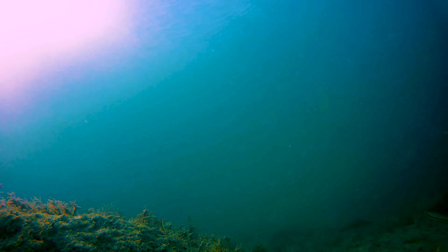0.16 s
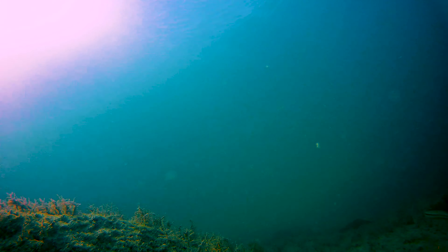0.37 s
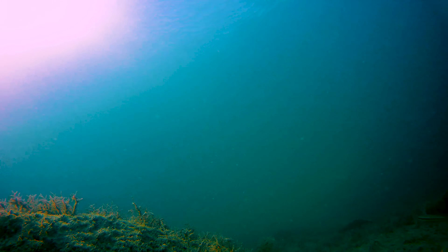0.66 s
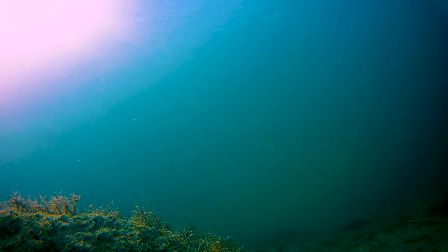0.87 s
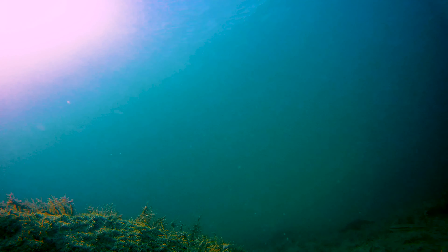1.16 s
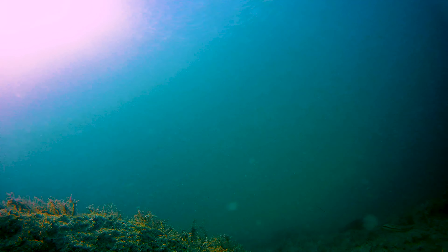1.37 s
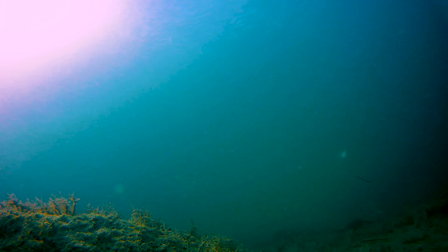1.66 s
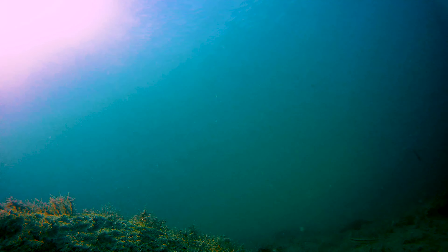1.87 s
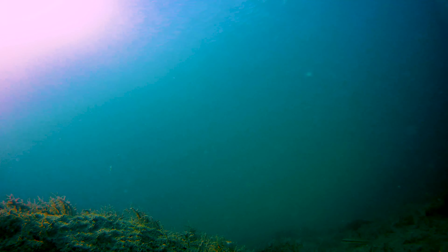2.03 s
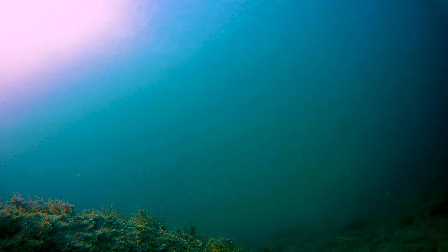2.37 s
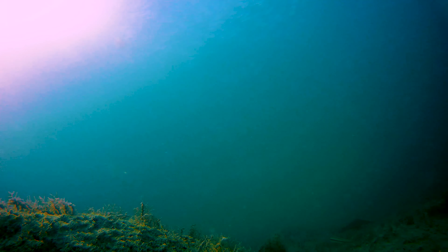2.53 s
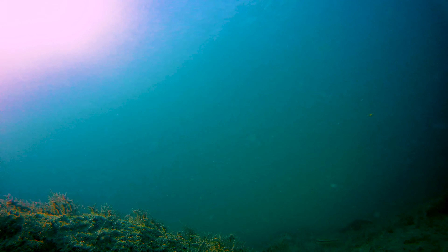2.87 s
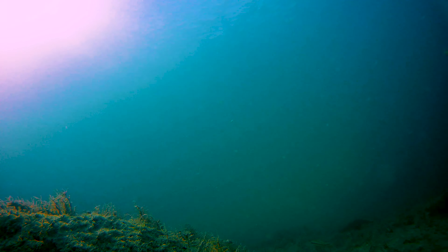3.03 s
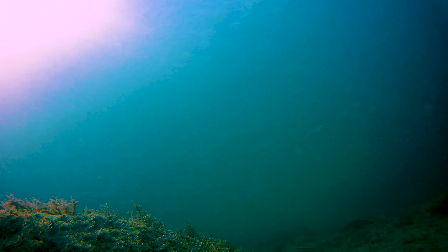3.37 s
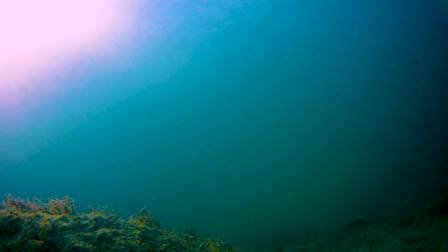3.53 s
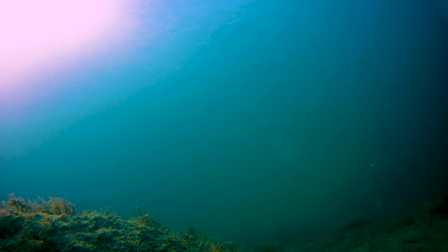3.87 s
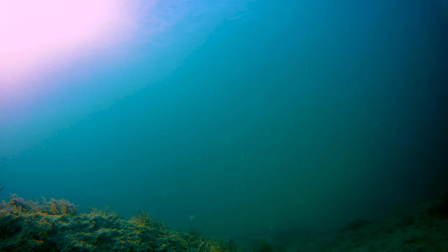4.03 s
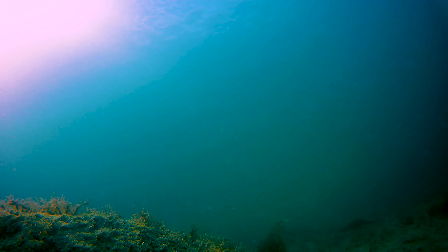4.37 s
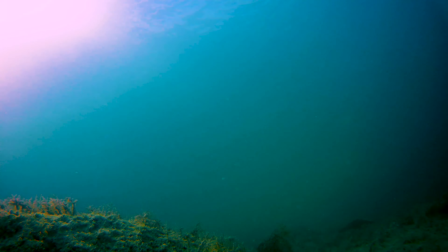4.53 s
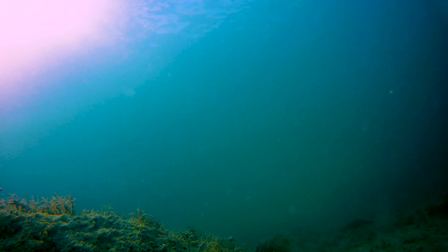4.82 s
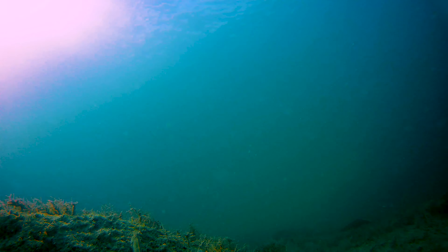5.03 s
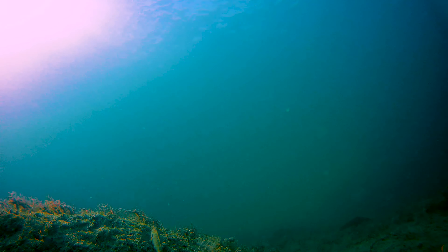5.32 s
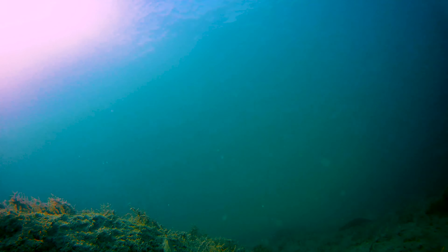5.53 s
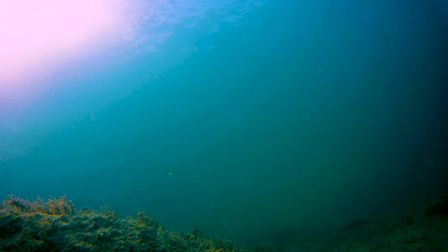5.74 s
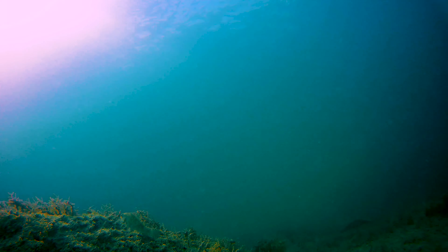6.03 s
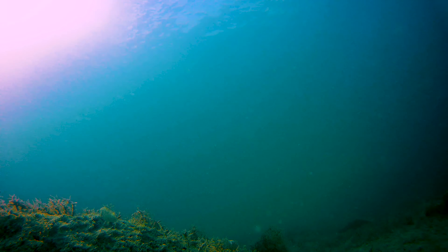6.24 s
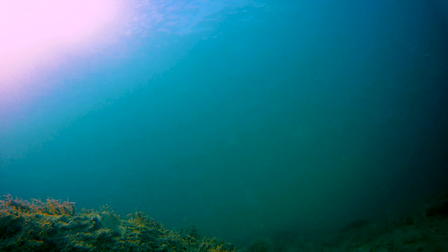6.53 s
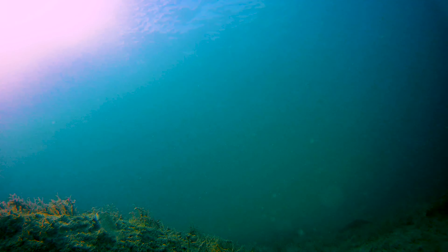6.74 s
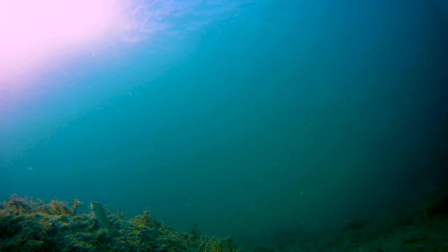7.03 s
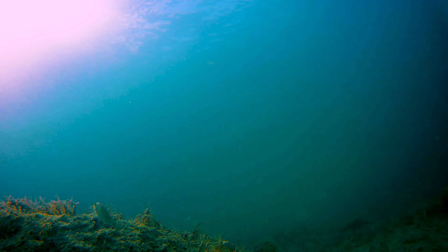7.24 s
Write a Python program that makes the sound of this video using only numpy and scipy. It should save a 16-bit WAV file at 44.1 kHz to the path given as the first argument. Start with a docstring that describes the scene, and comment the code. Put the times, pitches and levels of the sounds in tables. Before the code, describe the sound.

The sound is close and enclosed, from a microphone inside a sealed housing on the sea bed. Throughout, deep water wash and two unsteady low throbs swell beneath faint hiss, while fine sand patters in gusts and larger grit makes irregular dry clicks, several per second, with tiny rebounds and short ringing. From 0 to about 4.3 seconds, current drums on the shell in muffled, uneven gurgles. Soft knocks open the scene, with a deep bump at 0.6 and more around 2.5 to 3.4 seconds. The gurgling slackens towards 5 seconds, exposing the ticks. At 5.3 a single heavy, hollow knock is the loudest event; a tight cluster of duller thuds follows near 5.8. Thin, faint wavering hums appear from 5.3, again around 5.9 and near 6.9. Weaker drumming returns from 6 seconds and continues with ticking grit until the end at 7.4.

```python
"""A sealed camera housing on the sea bed in a strong current, heard by a microphone inside it for 7.4 s.
Throughout: open-water wash, two low sway tones of the mount, ticking grit and pattering sand on the ringing shell.
From the start eddies drum on the shell as shaped noise, and soft knocks strike a few of its modes.
The eddies slacken near 5 s; the heaviest knock falls at 5.3 s and a cluster follows near 5.8 s.
From 5.3 s thin wavering hums fade in and out, and part of the drumming returns from 6 s."""
import sys
import numpy as np
from scipy import signal
from scipy.fft import rfft, irfft, next_fast_len
from scipy.io import wavfile
from scipy.ndimage import uniform_filter1d

SR = 44100
rng = np.random.default_rng(int(sys.argv[2]) if len(sys.argv) > 2 else 0)


def persist_wave(psi):
    """Save psi, clipped to +-1, as 16-bit WAV."""
    counts = np.round(np.clip(psi, -1, 1) * 32767).astype(np.int16)
    wavfile.write(sys.argv[1], SR, np.atleast_2d(counts).T)


def gain_from_decibels(decibels):
    """Convert decibel values to linear amplitude factors."""
    exponent = np.asarray(decibels, float) / 20
    return 10 ** exponent


N = 325899

# Spectra. Each row: frequency in Hz, relative density in dB per Hz.
HISS_SPECTRUM = [(530, -18), (900, 1), (1100, -3), (1650, -1.5), (3340, -11), (3950, -12), (4560, -14),
                 (5450, -11.5), (6440, -15.5), (10800, -16.5), (15600, -19)]
WATER_SPECTRUM = [(12, -45), (20, -10), (43, -3), (58, -0.5), (79, -10.5), (107, -18), (134, -20.5),
                  (236, -43), (344, -28.5), (422, -38.5), (527, -31), (615, -34.5), (1200, -50),
                  (1560, -69), (2640, -120)]
EDDY_SPECTRUM = [(44, -46), (75, -54), (79, -21), (81, -28), (139, -10), (170, -2.5), (313, -10),
                 (384, -21), (477, -9), (614, -21.5), (680, -16.5), (780, -35), (874, -28), (947, -60),
                 (1150, -37), (1500, -32.5), (2530, -120)]
# Sway modes of the mount, shaken unevenly. Each row: time in seconds, pitch in Hz, rms level in dB.
LOW_SWAY = [(0.0, 31.8, -35), (0.14, 32.1, -34), (0.22, 34.9, -33), (0.35, 33.2, -31), (0.82, 34.2, -38.5),
            (0.9, 34.4, -25), (0.93, 31.8, -38), (1.15, 33.7, -40), (1.27, 34.3, -33), (1.77, 34, -39.5),
            (2.57, 31.68, -30), (2.98, 31.87, -31), (3.02, 32.14, -28), (3.72, 31.65, -33),
            (3.91, 33.1, -28.5), (4.14, 34.55, -38), (4.28, 34.2, -28), (4.73, 34.14, -28.5),
            (4.9, 32.76, -32.5), (5.29, 33.26, -31), (5.5, 29.9, -53), (5.6, 34.14, -38),
            (5.93, 33.89, -30.5), (6.03, 37.5, -37.5), (6.15, 35.7, -29), (6.52, 35.5, -30),
            (6.63, 34.53, -26.5), (7.29, 34.3, -29.5), (7.37, 36.4, -28), (7.39, 37.1, -69)]
HIGH_SWAY = [(0.0, 50.6, -30.5), (0.12, 52, -25), (0.25, 56.6, -36.5), (0.33, 52.55, -36),
             (0.51, 52.05, -23.5), (1.21, 51.95, -34.5), (1.46, 52.06, -26), (1.54, 49.14, -32),
             (1.63, 48.74, -30), (1.77, 52.96, -26), (2.02, 54.46, -32), (2.1, 53.23, -24.5),
             (2.18, 52.98, -39.5), (2.45, 54.8, -26.5), (2.55, 52.38, -27.5), (2.74, 51.74, -40),
             (2.8, 52.6, -26), (3.04, 52.94, -39), (3.21, 50.4, -23.5), (3.38, 51.07, -41),
             (3.5, 55.3, -24.5), (3.66, 53.7, -36), (3.95, 55.03, -28.5), (3.97, 56.5, -49),
             (4.05, 55.8, -25.5), (4.22, 53.9, -25.5), (4.51, 53.1, -24), (4.59, 52.86, -42),
             (4.69, 47.8, -33.5), (4.82, 50.6, -25.5), (5.41, 50.54, -31), (5.45, 50.56, -48),
             (5.54, 54.1, -30), (6.05, 55.53, -37), (6.13, 53.7, -31.5), (6.5, 51.67, -34),
             (6.57, 53.95, -36), (6.81, 53.17, -35.5), (6.96, 59.7, -41), (7.02, 59.5, -38),
             (7.16, 52.74, -30.5), (7.39, 49.27, -34)]
# Strength of the eddies on the shell. Each row: time in seconds, rms level in dB.
EDDY_STRENGTH = [(0.0, -42.5), (0.22, -41.5), (1.79, -39.5), (2.16, -42), (2.45, -40.5), (4.2, -43.5),
                 (4.45, -50.5), (4.94, -61.5), (5.64, -61), (5.97, -48), (6.4, -51.5), (6.9, -53),
                 (7.1, -45.5), (7.39, -47.5)]
# Faint hums in the flow. Each row: start in seconds, length in seconds, pitch in Hz, rms level in dB.
FLOW_HUMS = [(5.33, 0.456, 174.7, -53), (5.9, 0.47, 188.2, -54.5), (6.861, 0.63, 320.8, -58),
             (6.85, 0.65, 192.3, -52)]
# Modes of the shell. Each row: frequency in Hz, relative level in dB, t60 in seconds.
SHELL_MODES = [(86, -7.5, 0.27), (122, 7, 0.18), (155, 3.5, 0.1), (200, -12, 0.0652), (246, -7, 0.16),
               (326.6, 0, 0.09), (441, 4, 0.021), (519.6, 4, 0.042), (648, -2, 0.045), (870, -9.5, 0.038),
               (1050, -20, 0.081), (1260, -17.5, 0.063), (1400, -5, 0.026), (1660, -6.5, 0.03),
               (1962, -10.5, 0.031), (2244, -8.5, 0.025), (2420, -13.5, 0.034), (2680, -8, 0.022),
               (3016, -11, 0.026), (3780, -6.5, 0.021), (4100, -7.5, 0.022), (4840, -12.5, 0.03),
               (5310, -2.5, 0.017), (5680, -7, 0.025), (5930, -4.5, 0.016), (6950, -4, 0.01),
               (7640, -3.5, 0.015), (9000, -5, 0.022), (9800, -2, 0.015), (10560, 10.5, 0.0094),
               (12200, 1, .006), (13600, -9, .006)]
# Soft, heavy blows. Each row: start in seconds, level in dB, centre of the modes struck in Hz, spread in octaves.
SOFT_BLOWS = [(.008, -24, 1050, 0.16), (.074, -25.5, 544, 0.23), (0.271, -34, 122, 0.64),
              (0.622, -21, 86, 0.21), (2.53, -26.5, 86, 0.29), (2.808, -30.5, 513, 0.18),
              (3.312, -27, 86, 0.35), (3.385, -32, 647.4, 0.28), (4.509, -41.5, 122, 0.25),
              (4.751, -41, 328, 1.2), (5.2929, -18.5, 644, 0.53), (5.2928, -8.5, 1557, 0.29),
              (5.2944, -26, 2260, 0.15), (5.2998, -30, 900, 0.41), (5.7659, -24.5, 648, 0.43),
              (5.771, -26.5, 515, 0.33), (5.778, -25.5, 392, 0.29), (5.776, -27, 154.5, 0.96),
              (5.786, -26.5, 282, 0.72), (5.797, -30, 200, 0.78), (5.99, -36.5, 122, 0.35),
              (6.34, -41, 122, 0.48), (7.029, -37, 118.1, 0.55)]
# Larger grit. Each row: start in seconds, dull level in dB, dull centre in Hz, middle-mode level in dB,
# bright level in dB, bright centre in Hz.
GRIT = [(0.0377, -42.5, 1850, -42.5, -34.5, 5400), (0.1281, -50, 1620, -63, -50, 5490),
        (0.1733, -46, 2370, -56, -44, 5800), (0.2, -67, 2390, -69, -50, 5660),
        (0.2846, -50, 2120, -55, -52.5, 5350), (0.354, -38, 2200, -47, -53, 7070),
        (0.385, -60, 2000, -59, -55, 5400), (0.43, -35, 1990, -50, -58, 7050),
        (0.435, -34.5, 1550, -45, -48, 5940), (0.5172, -37.5, 1630, -61, -63, 6500),
        (0.523, -53, 1740, -57, -50, 6240), (0.538, -32, 2000, -54, -56, 5980),
        (0.618, -60, 2000, -65, -58, 5600), (0.6675, -46, 1760, -49, -52, 5510),
        (0.745, -60, 2000, -62, -56, 5500), (0.8199, -47, 1750, -62, -46.5, 5580),
        (0.8724, -54, 1400, -67, -65, 5430), (0.8926, -59, 1870, -59, -53, 5480),
        (0.9035, -50, 2440, -49, -50, 5880), (0.924, -49, 2870, -56, -51, 5690),
        (0.948, -43, 1510, -52, -57, 6520), (0.988, -61, 2000, -62, -56, 5400),
        (1.071, -58, 2595, -56, -51, 5520), (1.3767, -44.5, 2180, -45, -46, 5880),
        (1.401, -31.5, 1560, -61, -57, 5900), (1.5967, -48, 1743, -46, -43, 5510),
        (1.6702, -46, 1400, -50, -48, 5970), (1.715, -37.5, 2410, -52, -42.5, 7500),
        (1.809, -56, 1730, -60, -48, 5960), (1.858, -44, 1821, -60, -53, 5400),
        (1.8684, -49, 2190, -54, -41.5, 5960), (1.9782, -45.5, 2440, -46, -46.5, 5820),
        (2.0475, -40.5, 1680, -40.5, -43.5, 5890), (2.0915, -62, 1985, -58, -57, 10500),
        (2.1214, -51, 1920, -56, -43, 5740), (2.129, -44.5, 1690, -64, -67, 5300),
        (2.23, -38, 2440, -46, -46, 7050), (2.2694, -40, 2345, -57, -50, 5506),
        (2.371, -38.5, 2206, -47.5, -59, 6930), (2.4718, -50, 1500, -66, -60, 5400),
        (2.6427, -35.5, 1750, -40, -40.5, 5334), (2.676, -45, 1990, -50, -62, 5190),
        (2.81, -44, 2240, -57, -49.5, 5600), (2.881, -45, 1522, -52, -40, 5270),
        (2.8866, -44, 2240, -36.5, -39, 5390), (2.914, -47, 1660, -52, -55, 6197),
        (3.0143, -33, 1995, -39.5, -63, 5640), (3.235, -45, 1612, -64, -64, 5110),
        (3.246, -44, 2050, -60, -64, 6190), (3.27, -46, 1630, -48, -42.5, 5400),
        (3.3136, -50, 1740, -50, -45, 6180), (3.5327, -44.5, 2287, -53, -46, 5567),
        (3.8018, -41.5, 1883, -46.5, -41.5, 5610), (3.9795, -40, 1940, -61, -54, 5280),
        (4.0585, -34.5, 1907, -39.5, -45, 6350), (4.2243, -39.5, 1676, -63, -56, 5960),
        (4.278, -38, 1852, -41, -43, 5470), (4.3042, -44, 1950, -55, -46, 5520),
        (4.466, -48, 2165, -53, -46, 6017), (4.4977, -45, 2248, -50, -50, 5433),
        (4.5343, -40.5, 1732, -64, -64, 7020), (4.577, -59, 1910, -49, -46, 6040),
        (4.5875, -36.5, 1630, -64, -58, 5680), (4.7508, -41, 2458, -49, -43.5, 5890),
        (4.8189, -53, 1645, -63, -42.5, 5780), (4.9208, -46, 1667, -54, -45, 5560),
        (4.9617, -38, 2283, -42, -45, 5416), (5.005, -59, 1510, -60, -61, 5510),
        (5.0436, -38, 1480, -60, -64, 5630), (5.056, -41, 1740, -47, -52, 5600),
        (5.1028, -56, 1535, -69, -55, 5450), (5.129, -52, 2010, -60, -52, 5820),
        (5.2106, -36, 1939, -53, -59, 5300), (5.221, -54, 2510, -57, -47, 5760),
        (5.229, -38, 2377, -46, -35, 5375), (5.2943, -60, 1590, -45, -41.5, 5707),
        (5.441, -42, 2350, -57, -57, 6200), (5.5174, -44, 1872, -64, -61, 5800),
        (5.5556, -37, 1860, -53, -49, 5390), (5.735, -54, 2237, -57, -46, 6300),
        (5.76, -43.5, 2005, -51, -49, 5810), (5.9797, -41.5, 1523, -50, -59, 6000),
        (6.062, -51, 2105, -56, -49, 5470), (6.2696, -45, 2106, -51, -56, 6594),
        (6.3836, -42, 2148, -48, -37, 5460), (6.429, -49, 1952, -60, -62, 5570),
        (6.4644, -38.5, 1509, -64, -58, 5720), (6.4898, -43, 2168, -57, -52, 5840),
        (6.6013, -32, 1808, -57, -42.5, 7140), (6.75, -49, 2200, -58, -52, 5600),
        (6.8436, -44.5, 1732, -47, -52, 5394), (6.901, -46, 1890, -58, -52, 5490),
        (7.0474, -58, 1885, -64, -51, 6140), (7.0643, -38.5, 1880, -60, -59, 5570),
        (7.077, -40, 1870, -53, -59, 5730), (7.099, -40, 2140, -47, -47.5, 5490),
        (7.1491, -33.5, 1860, -48, -48, 7260), (7.2136, -43, 2040, -57, -48.5, 6020)]

SHELL_HZ = np.array(SHELL_MODES)[:, 0]
SWELLS_PER_S = 2.95


def curve(table, column):
    """One column of a table, interpolated sample by sample."""
    rows = np.array(table, float)
    return np.interp(np.arange(N) / SR, rows[:, 0], rows[:, column])


def walk(rate_per_s):
    """Random levels held 1 / rate_per_s seconds and slewed twice; spread near 1."""
    hold = int(SR / rate_per_s)
    steps = np.repeat(rng.standard_normal(N // hold + 1), hold)
    slewed = uniform_filter1d(uniform_filter1d(steps, hold), hold)
    return 1.196 * slewed[:N]


def noise(spectrum_db, rms_db, flicker_db, flickers_per_s, swell_db=0, bands_per_octave=1):
    """Shaped noise whose overlapping bands flicker and swell each on their own."""
    size = next_fast_len(N)
    octave = np.log2(np.arange(1, size // 2 + 2) * SR / size)
    hz, shape_db = np.transpose(spectrum_db)
    gain = gain_from_decibels(np.interp(octave, np.log2(hz), shape_db, -120, -120))
    spectrum = rfft(rng.standard_normal(size)) * gain
    out = 0
    for centre in np.arange(np.floor(np.log2(hz[0])), np.log2(hz[-1]) + 1, 1 / bands_per_octave):
        window = np.clip(1 - bands_per_octave * abs(octave - centre), 0, 1)
        band = irfft(spectrum * window, size)[:N]
        level_db = flicker_db * walk(flickers_per_s) + swell_db * walk(SWELLS_PER_S)
        out = out + band * gain_from_decibels(level_db)
    return out * gain_from_decibels(rms_db) / np.sqrt(np.mean(out ** 2))


def hiss():
    """Microphone hiss: shaped noise with a slight flicker."""
    return noise(HISS_SPECTRUM, -62, flicker_db=0.7, flickers_per_s=12)


def water():
    """Deep wash of open water: low noise whose bands flicker."""
    return noise(WATER_SPECTRUM, -36.5, flicker_db=2.5, flickers_per_s=6.8)


def sway(table):
    """One mode of the mount, nearly a sine, nudged in pitch and swing by the buffeting."""
    hz = curve(table, 1) * (1 + 0.0038 * walk(7.6))
    rms_db = curve(table, 2) + 0.6 * walk(8)
    cycles = np.cumsum(hz) / SR + rng.random()
    return np.sqrt(2) * gain_from_decibels(rms_db) * np.sin(2 * np.pi * cycles)


def eddies():
    """Turbulence drums on the shell in uneven gurgles and slackens with the current."""
    drumming = noise(EDDY_SPECTRUM, 0, flicker_db=1, flickers_per_s=12, swell_db=3, bands_per_octave=3)
    return drumming * gain_from_decibels(curve(EDDY_STRENGTH, 1))


def hums():
    """Thin tones in the flow that fade in, waver in pitch and level and fade out."""
    fade_s, pitch_waver = 0.11, 0.01238
    t, out = np.arange(N) / SR, 0
    for start_s, length_s, hz, rms_db in FLOW_HUMS:
        fade = np.clip(np.minimum(t - start_s, start_s + length_s - t) / fade_s, 0, 1)
        level = fade * gain_from_decibels(rms_db + 4.2 * walk(9))
        cycles = np.cumsum(hz * (1 + pitch_waver * walk(8.4))) / SR
        out = out + np.sqrt(2) * level * np.sin(2 * np.pi * cycles)
    return out


def struck(db, centre_hz, spread_octaves):
    """Drive of each mode for blows that move chiefly the modes near their own hardness."""
    spreads_off = np.log2(SHELL_HZ / centre_hz[:, None]) / spread_octaves
    return db[:, None] - 6 * spreads_off ** 2


def sample_index(s):
    """Times in seconds as sample numbers, kept inside the scene."""
    return np.clip((SR * s).astype(int), 0, N - 1)


def crack(s, db):
    """Dry snap of each contact: a band of noise that dies in a few milliseconds."""
    t60_s, band_hz = 0.005, [1500, 7000]
    push = np.bincount(sample_index(s), gain_from_decibels(db), N)
    fade = np.exp(-np.log(1000) / (t60_s * SR))
    burst = signal.lfilter([1], [1, -fade], push) * rng.standard_normal(N)
    return signal.sosfilt(signal.butter(2, band_hz, "bandpass", fs=SR, output="sos"), burst)


def ring(s, db, scatter_db, rise_cycles, rattle_cycles):
    """Blows ring the shell as decaying modes, with random level and timing for each mode."""
    out = np.zeros(N)
    chance = rng.standard_normal((len(s), len(SHELL_MODES), 2))
    for k, (hz, mode_db, t60_s) in enumerate(SHELL_MODES):
        # the contact rattles for part of a cycle, so the modes do not start together
        at = sample_index(s + rattle_cycles * chance[:, k, 0] / hz)
        push = np.bincount(at, gain_from_decibels(db[:, k] + mode_db + scatter_db * chance[:, k, 1]), N)
        # water cushions the blow: two smoothing poles make the mode build up gradually
        turn = np.exp(2j * np.pi * hz / SR)
        rise = np.exp(-hz / (rise_cycles * SR))
        fade = np.exp(-np.log(1000) / (t60_s * SR))
        poles = np.poly([turn * fade, turn * rise, turn * rise])
        out += signal.lfilter([(1 - rise) ** 2], poles, push).imag
    return out


def sand():
    """Fine sand patters at random, its level in gusts; each grain rings chiefly modes near its hardness."""
    grains_per_s, base_db, spread_db, range_db = 120, -59.5, 1, 7
    centre_hz, scatter_octaves, tilt_db_per_octave = 3310, 1.13, -3
    count = int(grains_per_s * N / SR)
    chance = rng.random((count, 2))
    gust_db = 5.5 * walk(6.5)[(chance[:, 0] * N).astype(int)]
    octaves = np.clip(scatter_octaves * rng.standard_normal(count), -1.2, 0.8)
    excess_db = np.minimum(gust_db - spread_db * np.log(1 - chance[:, 1]), range_db)
    grain_db = base_db + excess_db + tilt_db_per_octave * octaves
    s = chance[:, 0] * N / SR
    db = struck(grain_db, centre_hz * 2 ** octaves, 0.59)
    return crack(s, grain_db - 7) + ring(s, db, scatter_db=4, rise_cycles=0.45, rattle_cycles=0.3)


def knocks():
    """Soft, heavy blows move chiefly the shell modes near their own softness."""
    s, db, centre_hz, spread_octaves = np.transpose(SOFT_BLOWS)
    mode_db = struck(db, centre_hz, spread_octaves[:, None])
    return ring(s, mode_db, scatter_db=0.4, rise_cycles=0.6, rattle_cycles=0.02)


def ticks():
    """Larger grit snaps and rings the shell; each grain rebounds once, 2-6 ms later and 10-20 dB weaker."""
    dull_top_hz, middle_top_hz, skirt_db = 3300, 4500, -28
    s, dull_db, dull_hz, middle_db, bright_db, bright_hz = np.transpose(GRIT)
    chance = rng.random((len(s), 2))
    is_dull = SHELL_HZ <= dull_top_hz
    is_middle = ~is_dull & (SHELL_HZ <= middle_top_hz)
    dull = struck(dull_db, dull_hz, 0.54)
    bright = np.maximum(struck(bright_db, bright_hz, 0.27), bright_db[:, None] + skirt_db)
    db = np.where(is_dull, dull, np.where(is_middle, middle_db[:, None], bright))
    s = np.concatenate([s, s + 0.002 + 0.004 * chance[:, 0]])
    db = np.concatenate([db, db - 10 - 10 * chance[:, 1:]])
    snap = crack(s, db[:, is_middle].mean(axis=1))
    return snap + ring(s, db, scatter_db=3, rise_cycles=0.4, rattle_cycles=0.3)


def scene():
    """Water, mount and flow behind the struck shell; one channel."""
    mount = sway(LOW_SWAY) + sway(HIGH_SWAY)
    flow = water() + eddies() + hums()
    shell = sand() + knocks() + ticks()
    return (mount + flow + shell)[None]


def roll_off(x):
    """The treble ends steeply here."""
    return signal.sosfilt(signal.butter(12, 15710, fs=SR, output="sos"), x)


def record(dry):
    """The microphone adds its hiss and a steep low-pass cuts the top."""
    top_hz, ripple_db, stop_db = 15700, 0.2, 70
    low_pass = signal.ellip(8, ripple_db, stop_db, top_hz, fs=SR, output="sos")
    mix = signal.sosfilt(low_pass, dry + hiss())
    return roll_off(mix)


dry = scene()
out = record(dry)
persist_wave(out)
```